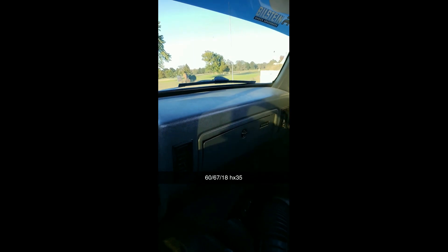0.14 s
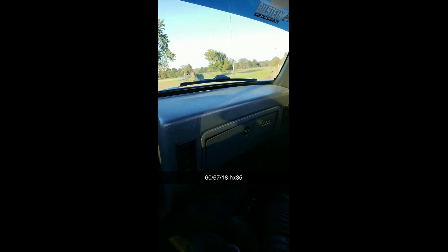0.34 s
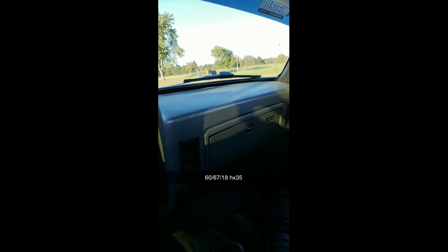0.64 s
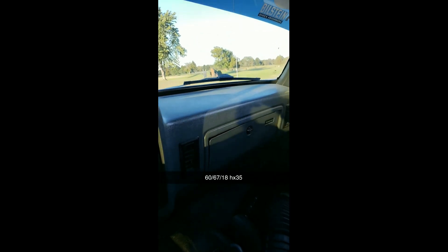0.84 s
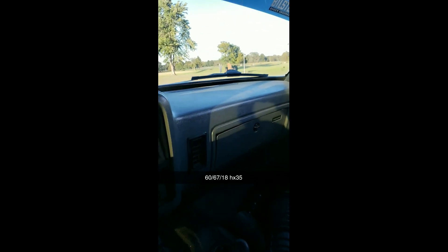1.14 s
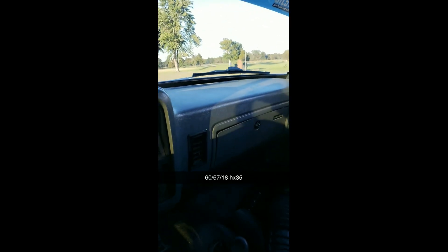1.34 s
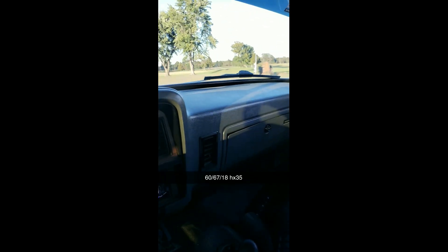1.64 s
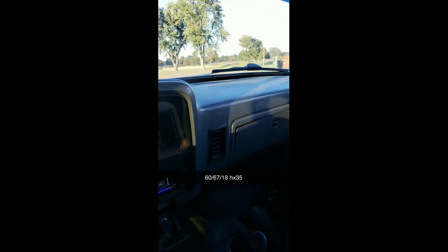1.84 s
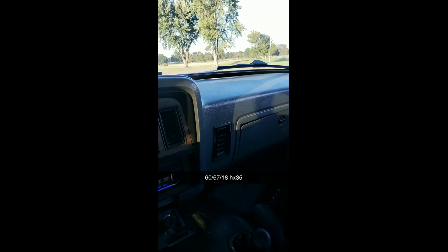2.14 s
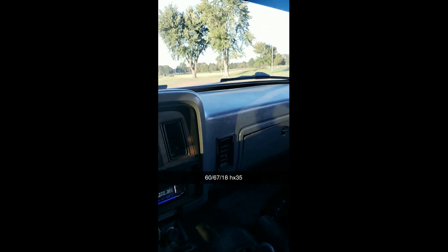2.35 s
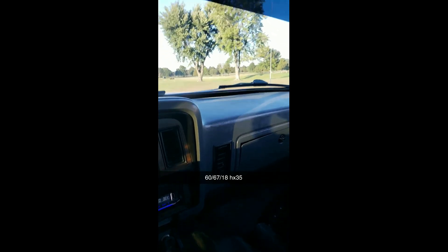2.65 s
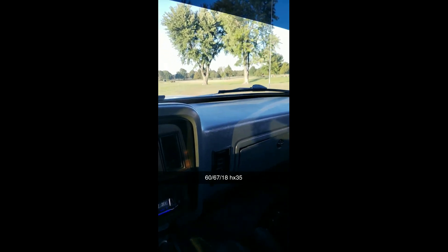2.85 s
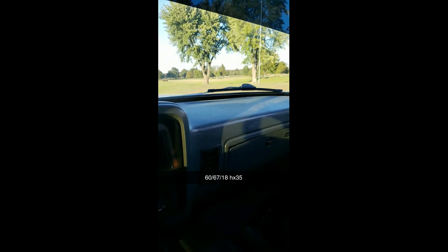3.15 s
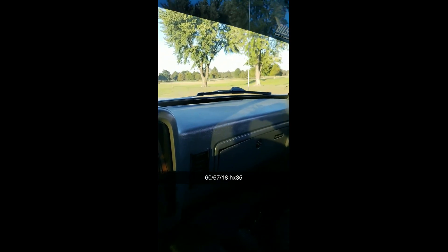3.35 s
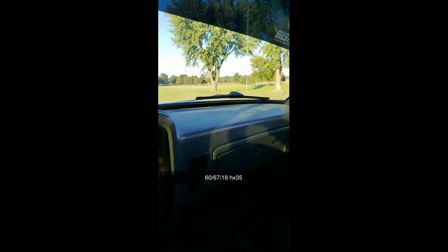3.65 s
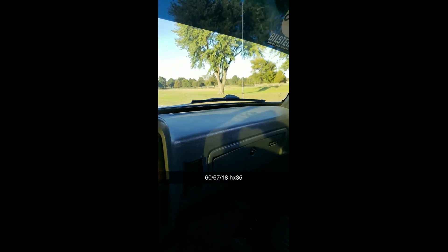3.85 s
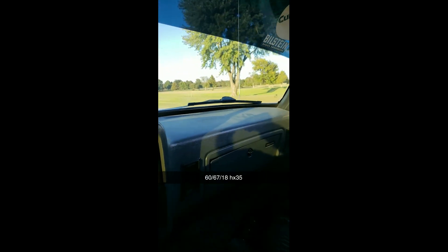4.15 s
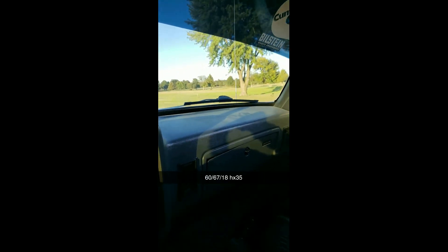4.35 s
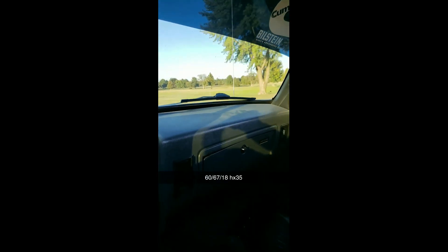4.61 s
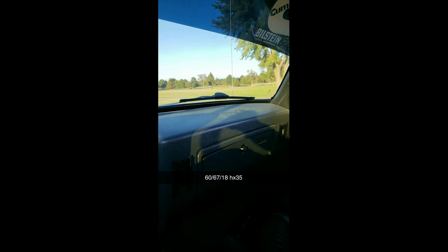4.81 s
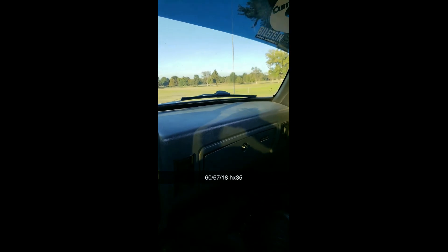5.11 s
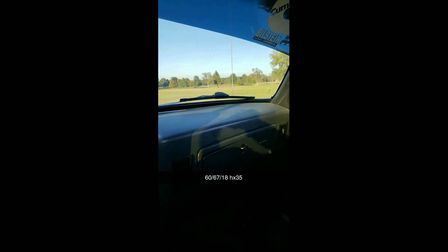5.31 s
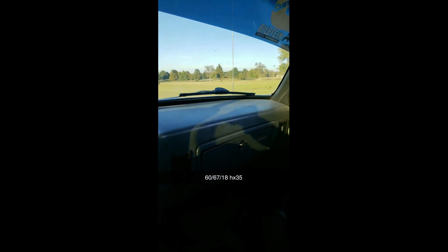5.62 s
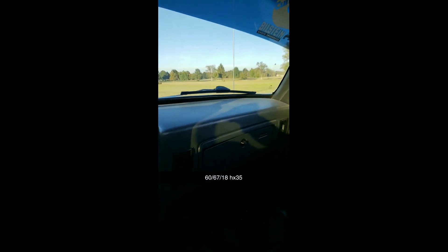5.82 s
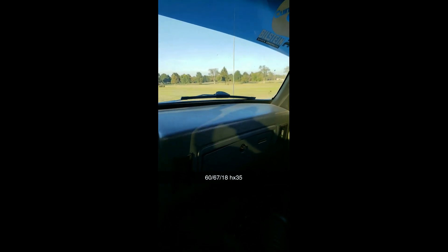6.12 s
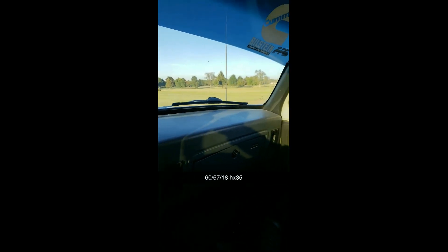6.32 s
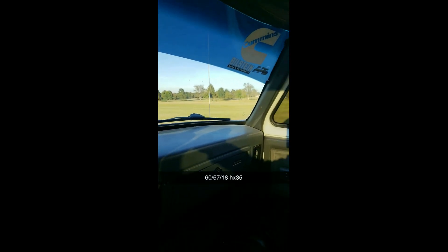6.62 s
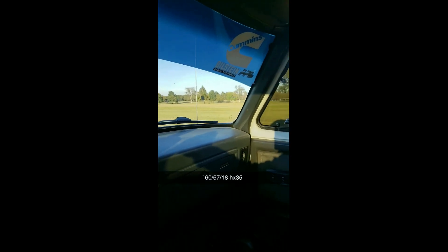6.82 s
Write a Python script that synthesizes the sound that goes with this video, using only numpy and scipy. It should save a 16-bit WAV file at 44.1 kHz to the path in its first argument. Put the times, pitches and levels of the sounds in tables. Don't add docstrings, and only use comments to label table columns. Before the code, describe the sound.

Inside a diesel pickup cab, a deep droning engine pulls away, dips at one gear change, then pulls harder under a rising turbo whistle.

```python
import sys
import numpy as np
from scipy import signal
from scipy.fft import rfft, irfft, next_fast_len
from scipy.io import wavfile
from scipy.ndimage import uniform_filter1d, map_coordinates

SR = 44100
rng = np.random.default_rng(int(sys.argv[2]) if len(sys.argv) > 2 else 0)


def store_pcm(level_fs):
    pcm = np.round(np.clip(level_fs, -1, 1) * 32767).astype(np.int16)
    wavfile.write(sys.argv[1], SR, np.atleast_2d(pcm).T)


def volts_from_decibels(level):
    exponent = np.asarray(level, float) / 20
    return 10 ** exponent


N = 307377
TIME = np.arange(N) / SR
CYLINDERS = 6

# centre f/Hz, width f/Hz, lift level/dB
PANEL_MODES = [(230, 25, 5), (285, 30, 4), (475, 50, 6), (575, 25, 3), (640, 70, 3), (765, 45, 4),
               (825, 30, -5), (965, 50, 3), (1230, 70, 3), (1280, 50, 5), (1550, 60, 3), (2100, 250, 3)]


def curves(table):
    s, *columns = np.transpose(table)
    return [np.interp(TIME, s, column) for column in columns]


def unit(x):
    return x / np.sqrt(np.mean(x ** 2))


def lift(hz, modes):
    return sum(lift_db / (1 + (2 * (hz - centre_hz) / width_hz) ** 2) for centre_hz, width_hz, lift_db in modes)


def colour(x, points, modes=()):
    size = next_fast_len(N)
    hz = np.maximum(np.arange(size // 2 + 1) * SR / size, 1)
    points_hz, points_db = np.transpose(points)
    db = np.interp(np.log(hz), np.log(points_hz), points_db, left=-90, right=-90)
    return unit(irfft(rfft(x, size) * volts_from_decibels(db + lift(hz, modes)), size)[:N])


def walk(rate, size=32):
    hold = int(SR / size / rate)
    held = np.repeat(rng.standard_normal(N // size // hold + 2), hold)
    slewed = unit(uniform_filter1d(uniform_filter1d(held, hold), hold))
    return np.interp(np.arange(N) / size, np.arange(len(slewed)), slewed)


def patchy(points, modes=(), rate=6, patchy_db=1.2, count=6):
    band_edges = np.geomspace(points[0][0], points[-1][0], count + 1)
    size = next_fast_len(N)
    hz = np.arange(size // 2 + 1) * SR / size
    spectrum = rfft(colour(rng.standard_normal(N), points, modes), size)
    total = np.zeros(N)
    for low, high in zip(band_edges, band_edges[1:]):
        band = irfft(spectrum * (hz >= low) * (hz < high), size)[:N]
        total += volts_from_decibels(patchy_db * walk(rate)) * band
    return unit(total)


def exhaust(hz, firings, boom_db, load_db):
    # cycles in two crank turns, level/dB at mean load, growth/dB per dB of load
    pipe_orders = [(3, -53.4, .9), (4, -54.7, 2.5), (9, -59.3, .6), (10, -61, 1.3), (12, -44.3, .1),
                   (15, -67.1, 1.4), (18, -66.9, -.7), (20, -75.2, 0), (24, -76, -.6), (28, -76.5, 2.8),
                   (30, -71, -.9), (32, -73.1, 1.5), (33, -76, .5), (34, -71.8, 2.3), (36, -70.5, 1.2),
                   (38, -72, 3), (40, -73.5, 1.2), (42, -72, .6), (44, -70, 1.9), (46, -73, .8)]
    # cycles in two crank turns, level/dB at mean load,
    # growth/dB per dB of load
    panel_orders = [(2, -55, 4.5), (5, -51.5, 2.5), (8, -53.5, 0), (16, -66.5, 0.5), (22, -65, -0.1),
                    (26, -64, 3.4), (48, -68.5, -0.5)]
    # centre f/Hz, width f/Hz, lift level/dB
    cab_modes = [(50, 17, 16), (117, 29, 16), (135, 5, -9), (161, 4, -5), (241, 42, 11.3), (280, 39, 13.1),
                 (310, 11, 13.2), (345, 50, 11), (428, 40, 10), (470, 45, 13.5), (508, 27, 6.6),
                 (574, 18, 9), (624, 20, 11), (655, 23, 6)]
    shift_s, shift_db = 3.85, 2
    out = volts_from_decibels(boom_db + .3 * walk(12)) * np.sin(2 * np.pi * (firings + .07))
    slow = slice(None, None, 64)
    gear_db = shift_db / 2 * np.tanh((TIME[slow] - shift_s) / .1)
    for orders, modes, waver_db, rate in ((pipe_orders, cab_modes, 1.3, 9), (panel_orders, PANEL_MODES, 3.77, 5)):
        for cycles, db, growth in orders:
            multiple = cycles / CYLINDERS
            order_db = db + gear_db + growth * load_db[slow]
            order_db = order_db + lift(multiple * hz[slow], modes) + waver_db * walk(rate)[slow]
            tone = np.sin(2 * np.pi * (multiple * firings + rng.random()))
            out += np.interp(TIME, TIME[slow], volts_from_decibels(order_db)) * tone
    return np.sqrt(2) * out


def clatter(firings, clatter_db):
    # f/Hz, level/dB per Hz
    tick_response = [(90, -25), (200, -7.5), (400, -9.5), (700, 1.5), (1000, 3), (1400, 0.5), (2000, -8.5),
                     (3000, -12), (4500, -18), (6000, -30.5)]
    # f/Hz, level/dB per Hz
    body_response = [(90, -21.5), (105, -3.5), (150, 0.5), (190, -12), (260, -10), (400, -18.5),
                     (700, -18.5), (1000, -20.5), (1400, -22.5), (2000, -28), (3000, -30), (4000, -60.5)]
    ticks_db, knock_db = -4.5, -14.5
    changes_per_s = 1.377
    steps = 1024
    angle = (firings + .012 * walk(15)) / CYLINDERS % 1 * steps
    patterns = rng.standard_normal((16, steps + 1))
    patterns[:, -1] = patterns[:, 0]
    age = np.clip(changes_per_s * TIME, 0, 14)
    old = age.astype(int)
    fade = np.pi / 2 * (age - old)
    old_ticks = map_coordinates(patterns, [old, angle], order=1)
    new_ticks = map_coordinates(patterns, [old + 1, angle], order=1)
    ticks = np.cos(fade) * old_ticks + np.sin(fade) * new_ticks
    knock = np.diff(np.floor(firings), prepend=0.)
    repeating = colour(unit(ticks) + 2 * volts_from_decibels(knock_db) * unit(knock), tick_response, PANEL_MODES)
    loose = patchy(body_response, PANEL_MODES, rate=7, patchy_db=1.5, count=8)
    return volts_from_decibels(clatter_db) * (volts_from_decibels(ticks_db) * repeating + loose)


def turbo():
    # t/s, f/Hz, level/dB
    whistle = [(0.0, 3327, -70), (0.72, 3827, -76), (0.96, 3950, -71), (1.2, 4049, -75), (1.8, 4345, -71),
               (2.16, 4570, -76), (2.4, 4733, -67), (2.76, 5022, -69), (3.24, 5344, -64), (3.6, 5552, -67),
               (3.84, 5647, -76), (4.1, 5640, -68), (4.56, 5896, -70), (5.0, 6300, -72), (5.4, 6670, -80),
               (5.85, 7045, -62), (6.2, 7312, -66), (6.97, 7875, -65)]
    hz, db = curves(whistle)
    turns = np.cumsum(hz + 10 * walk(30)) / SR
    tone = volts_from_decibels(db - 1.3 + walk(9)) * (1 + .7 * walk(30)) * np.sin(2 * np.pi * turns)
    breath = colour(rng.standard_normal(N), [(20, -2.5), (300, -7.0), (900, -13.5)])
    swirl = volts_from_decibels(-67 + 0.6 * (db - db.mean())) * np.sin(2 * np.pi * .95 * turns)
    octave = volts_from_decibels(-75 + 3.0 * (TIME - TIME[-1])) * np.sin(4 * np.pi * turns)
    return np.sqrt(2) * (tone + breath * (swirl + octave))


def intake_rush(load_db):
    # f/Hz, level/dB per Hz
    rush_response = [(1760, -26.5), (3000, -12.5), (3410, -5), (3850, -4), (4600, 1.5), (5300, 0),
                     (5790, -1), (6460, -5), (7520, -15.5), (8560, -32)]
    # centre f/Hz, width f/Hz, lift level/dB
    duct_modes = [(3470, 76, 3), (4900, 80, 1), (5240, 200, 4.5), (5730, 89, 5.5), (7000, 290, 5)]
    rush_db = -67 + 1.9 * load_db
    return volts_from_decibels(rush_db + 0.36 * walk(10)) * patchy(rush_response, duct_modes, rate=6.4, patchy_db=1.0)


def trim_buzz(clatter_db):
    # f/Hz, level/dB per Hz
    dash_response = [(1500, -11.5), (1900, -0.5), (2150, 1.5), (2500, -1), (3100, -8)]
    # centre f/Hz, width f/Hz, lift level/dB
    trim_modes = [(1930, 60, 3.5), (2160, 64, 3), (2400, 60, -7), (2500, 70, 4), (2980, 64, 4.5)]
    buzz = patchy(dash_response, trim_modes, rate=14, patchy_db=2.5, count=5)
    return volts_from_decibels(clatter_db - 17 + 1.2 * walk(11)) * buzz


def road():
    # f/Hz, level/dB per Hz
    rumble_response = [(3, -22), (15, -14.5), (25, -6.5), (38, -1), (52, -4.5), (70, -5), (95, -12.5),
                       (125, -8), (160, -22), (200, -27.5)]
    jolt_db, jolt_s = 9.5, 0.14
    road_db = -40.5 + 0.72 * TIME + jolt_db * np.exp(-TIME / jolt_s)
    return volts_from_decibels(road_db + 1.6 * walk(3.5)) * colour(rng.standard_normal(N), rumble_response)


def wind():
    # f/Hz, level/dB per Hz
    wind_response = [(6000, -24.5), (7500, 1), (8600, -7.5), (10400, -4), (11800, 2.5), (13500, -2.5),
                     (15000, 0.5), (15720, -2.5)]
    draught_db, draught_s = 4, .35
    wind_db = -80.5 + 3 * TIME + draught_db * np.exp(-TIME / draught_s)
    return volts_from_decibels(wind_db + .7 * walk(12)) * patchy(wind_response, rate=9, patchy_db=0.6, count=4)


def scene():
    # t/s, firing rate f/Hz, cab boom level/dB
    revs = [(0, 63.8, -15), (0.2, 66.62, -14.5), (0.6, 69.3, -14.8), (1.1, 72.15, -15),
            (1.75, 74.82, -16.5), (2.1, 76.9, -17.5), (2.4, 78.53, -20.5), (2.75, 80.9, -20.5),
            (3, 81.3, -19.5), (3.5, 84.12, -20.5), (3.6, 84.6, -22), (3.76, 81.45, -18),
            (3.92, 77.3, -16.5), (4.07, 77.3, -15.5), (4.9, 82.85, -16), (5.5, 85.12, -18.5),
            (6.4, 90.88, -18.4), (6.97, 91.64, -20.5)]
    # t/s, clatter level/dB over the pull-away
    engine_load = [
        (0.0, 0.5),
        (1.9, 0),
        (3.5, 3.2),
        (4.3, 3.5),
        (5.5, 5),
        (6.97, 6.5),
    ]
    hz, boom_db = curves(revs)
    load_db, = curves(engine_load)
    clatter_db = -47 + load_db
    firings = np.cumsum(hz) / SR
    engine = exhaust(hz, firings, boom_db, load_db - load_db.mean()) + clatter(firings, clatter_db)
    air = turbo() + intake_rush(load_db)
    return (engine + air + trim_buzz(clatter_db) + road() + wind())[None]


def top_cut(x):
    return signal.sosfilt(signal.butter(12, 16670, fs=SR, output="sos"), x)


def record(dry):
    # t/s, length t/s, depth level/dB
    dropouts = [(.575, .016, -17), (.991, .018, -17), (1.131, .018, -18), (2.175, .018, -17),
                (2.432, .014, -17), (2.78, .016, -17), (2.85, .015, -17), (2.988, .014, -18),
                (3.129, .015, -18), (3.244, .014, -19), (3.964, .014, -18), (6.274, .028, -38)]
    slices_hz = [2050, 2350, 2600, 3200, 3900, 4350, 5200, 5450, 5800, 6200, 6900, 7400]
    gain = volts_from_decibels(sum(db * np.exp(-((TIME - s) / (length / 2)) ** 4) for s, length, db in dropouts))
    size = next_fast_len(N)
    hz = np.arange(size // 2 + 1) * SR / size
    slices = sum(np.exp(-((hz - kept_hz) / 40) ** 2) for kept_hz in slices_hz)
    survives = (hz < 1800) + 1.8 * slices
    starved = irfft(rfft(dry, size) * survives, size)[:, :N]
    mix = gain * dry + (1 - gain) * starved
    low_pass = signal.ellip(12, .2, 60, 15720, fs=SR, output="sos")
    return top_cut(signal.sosfilt(low_pass, mix))


dry = scene()
out = record(dry)
store_pcm(out)
```